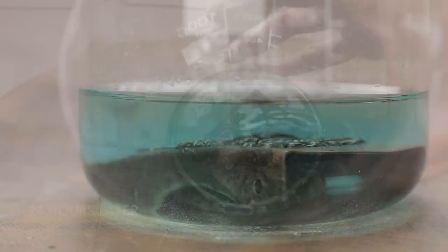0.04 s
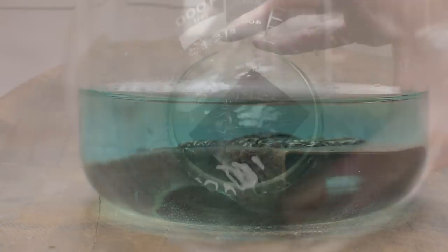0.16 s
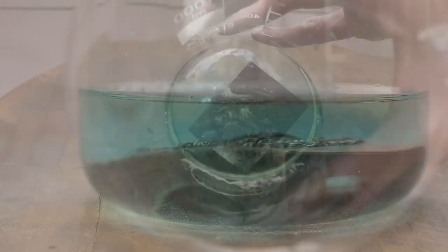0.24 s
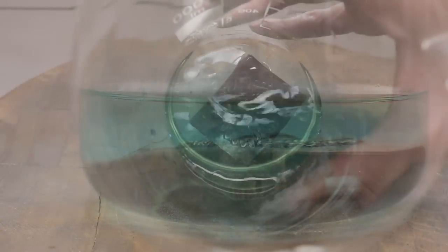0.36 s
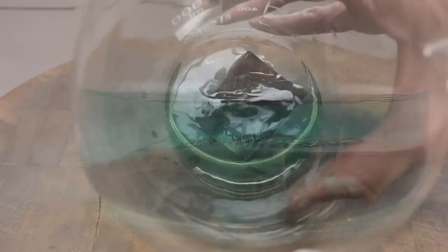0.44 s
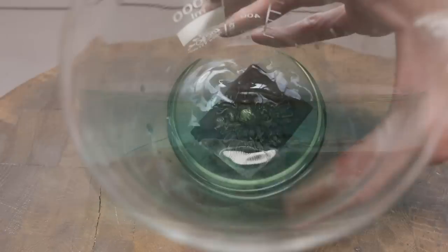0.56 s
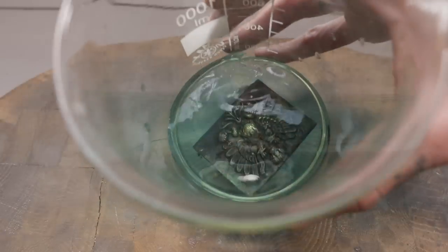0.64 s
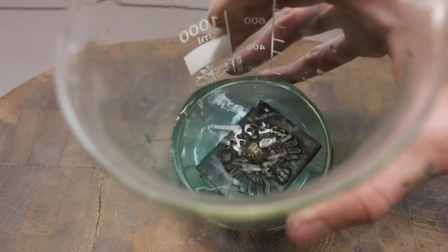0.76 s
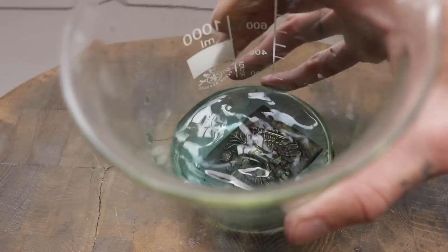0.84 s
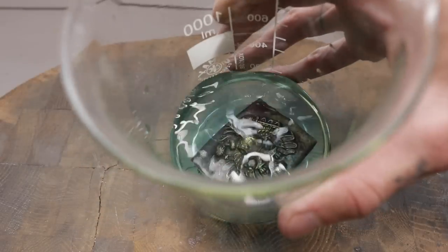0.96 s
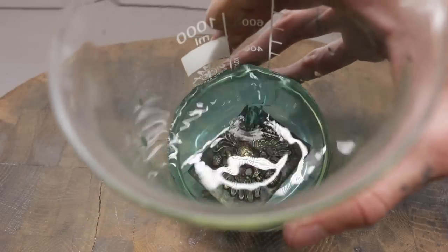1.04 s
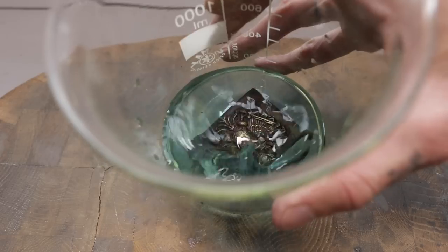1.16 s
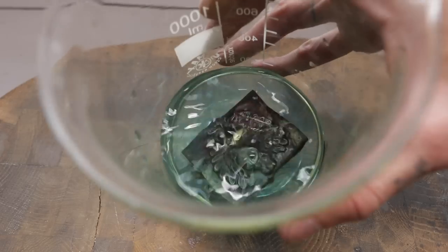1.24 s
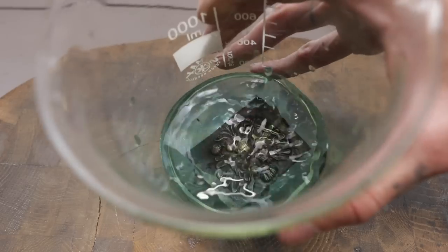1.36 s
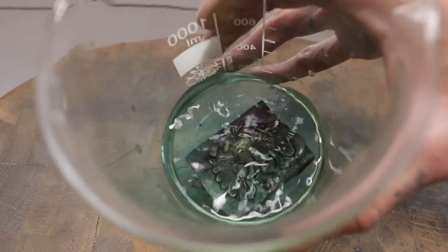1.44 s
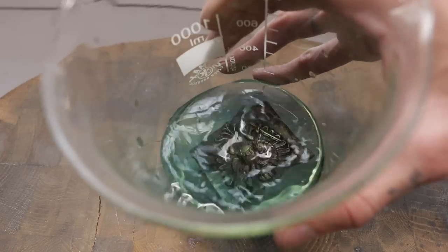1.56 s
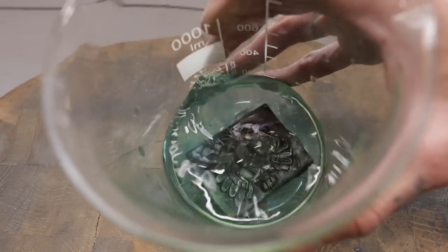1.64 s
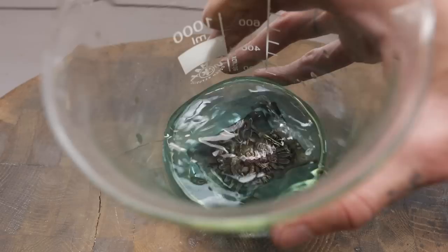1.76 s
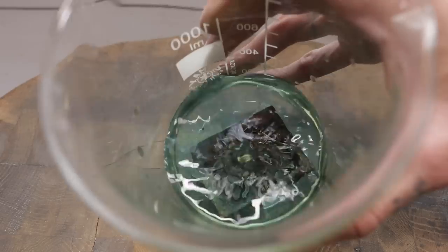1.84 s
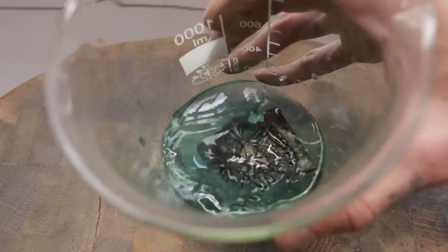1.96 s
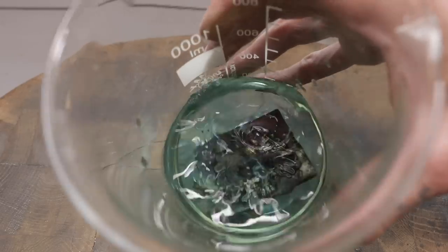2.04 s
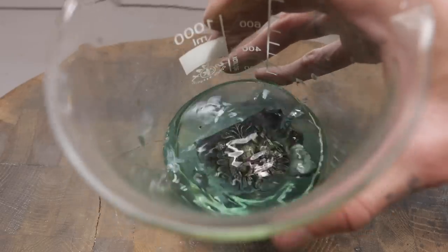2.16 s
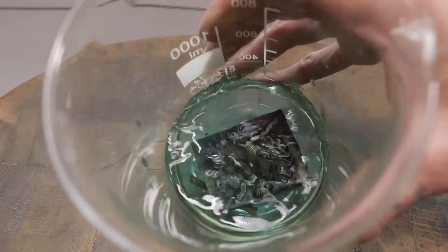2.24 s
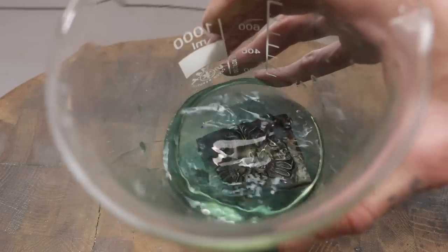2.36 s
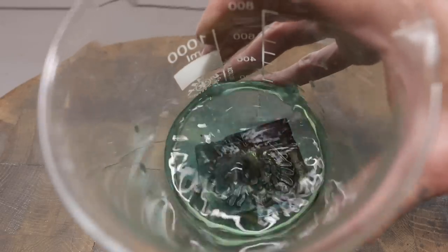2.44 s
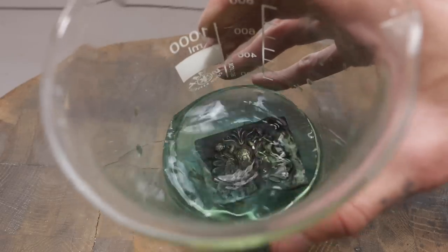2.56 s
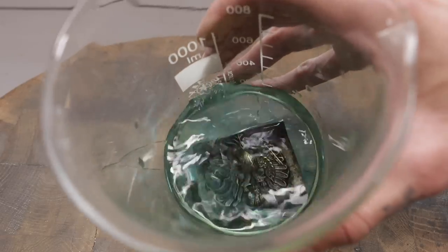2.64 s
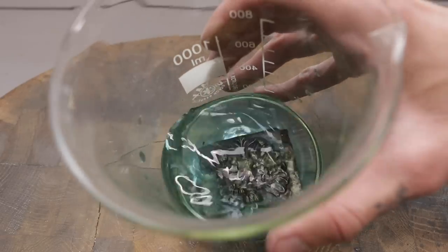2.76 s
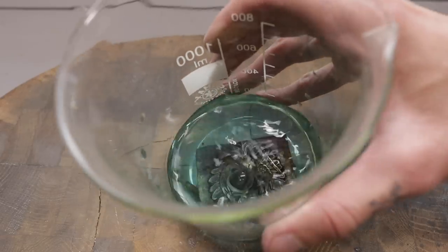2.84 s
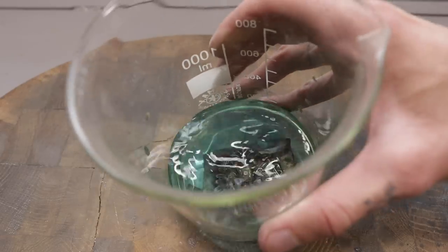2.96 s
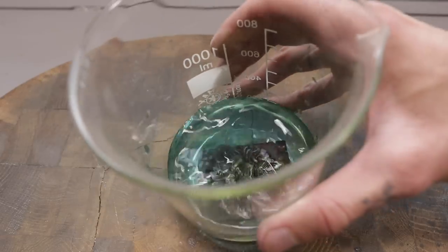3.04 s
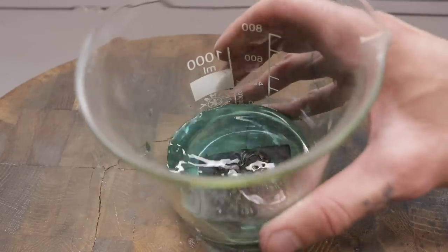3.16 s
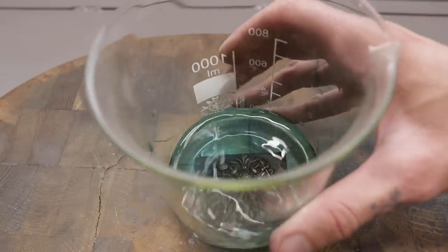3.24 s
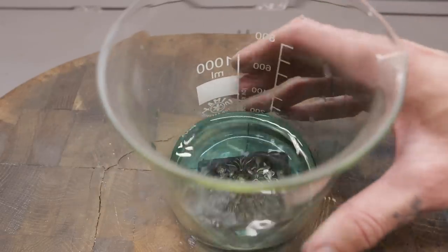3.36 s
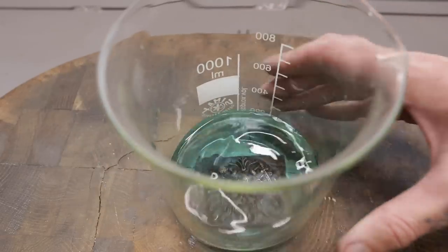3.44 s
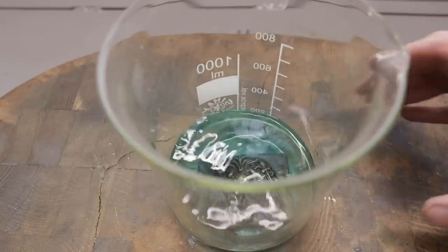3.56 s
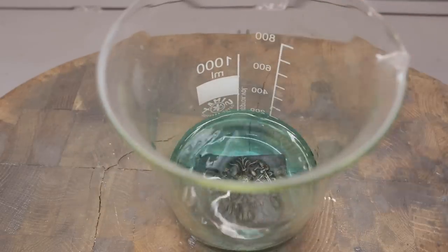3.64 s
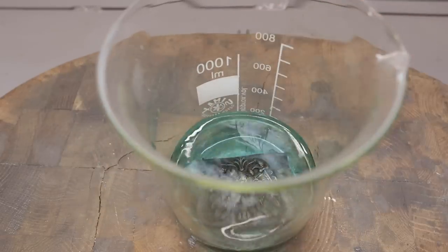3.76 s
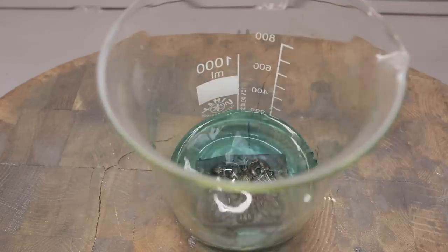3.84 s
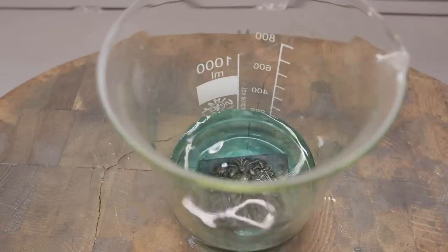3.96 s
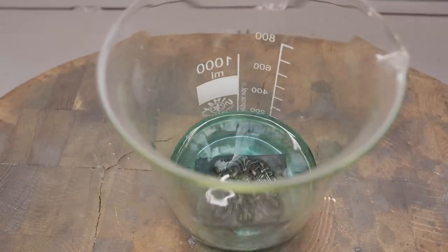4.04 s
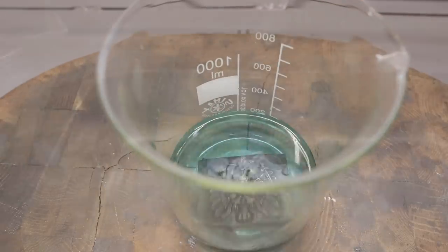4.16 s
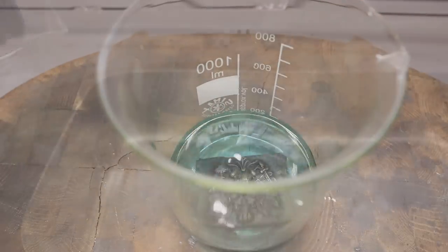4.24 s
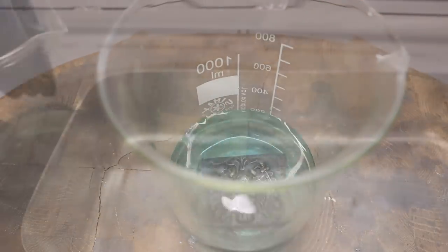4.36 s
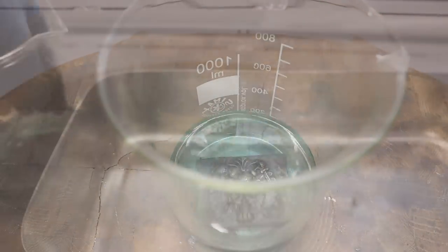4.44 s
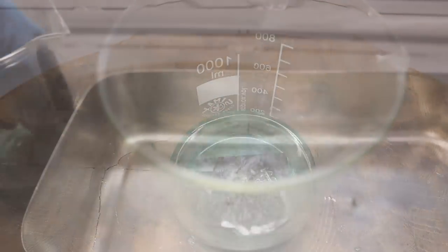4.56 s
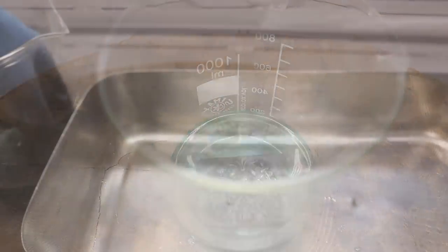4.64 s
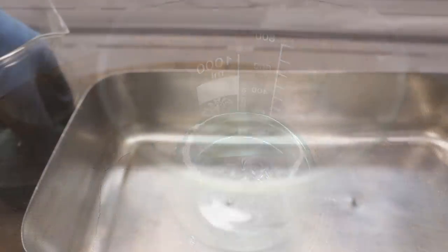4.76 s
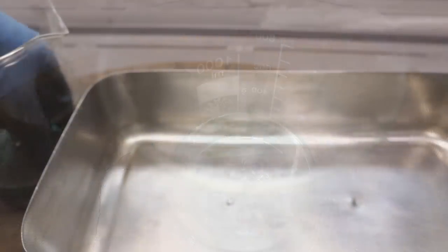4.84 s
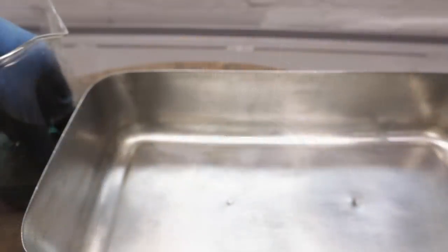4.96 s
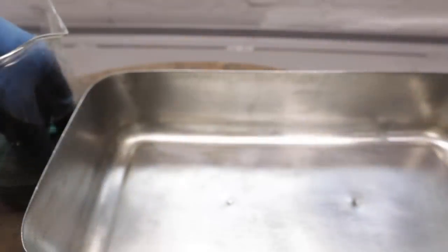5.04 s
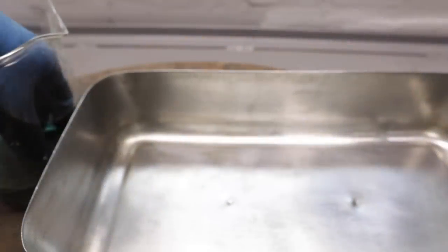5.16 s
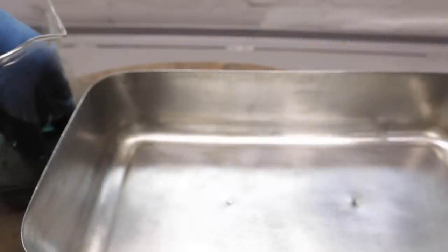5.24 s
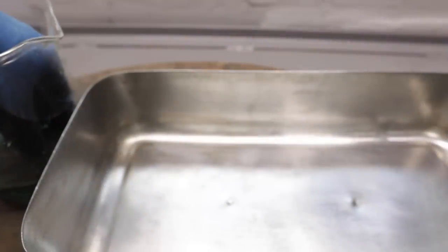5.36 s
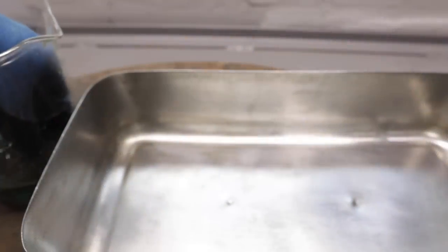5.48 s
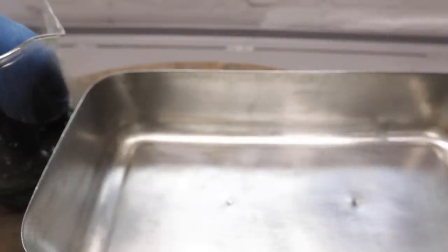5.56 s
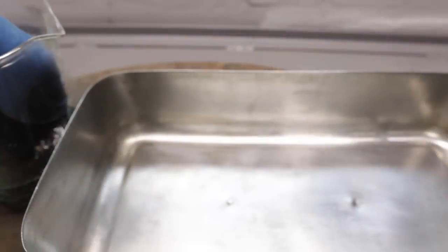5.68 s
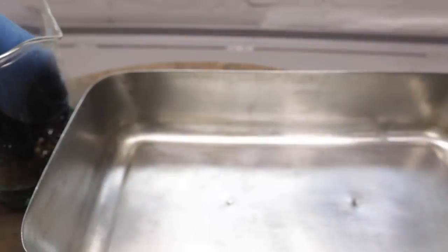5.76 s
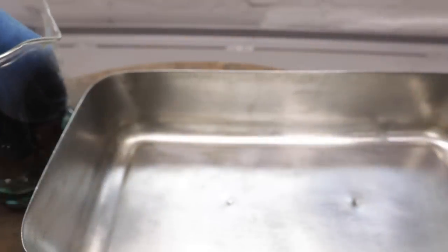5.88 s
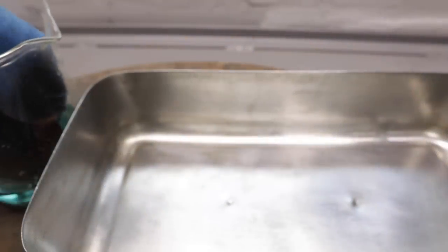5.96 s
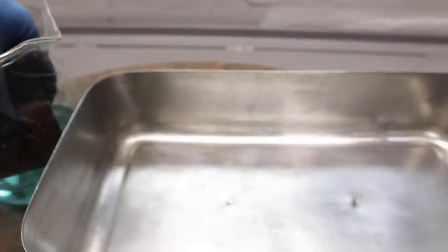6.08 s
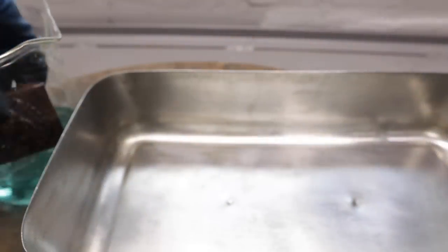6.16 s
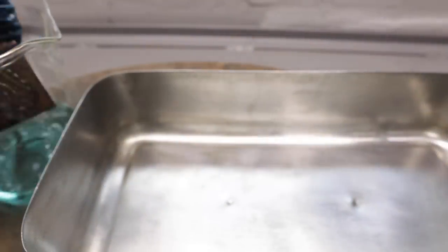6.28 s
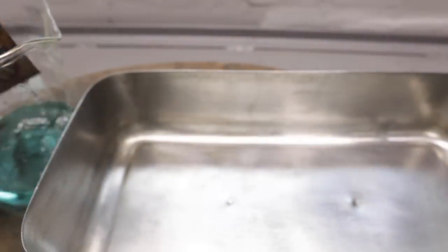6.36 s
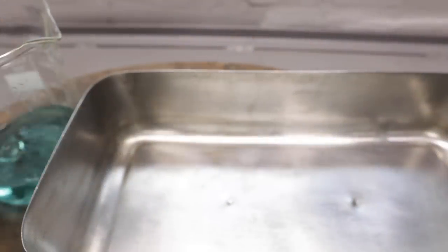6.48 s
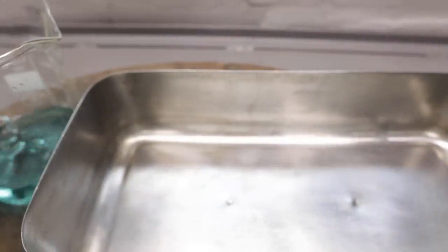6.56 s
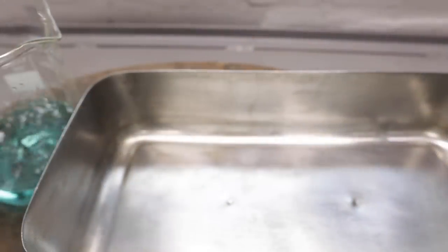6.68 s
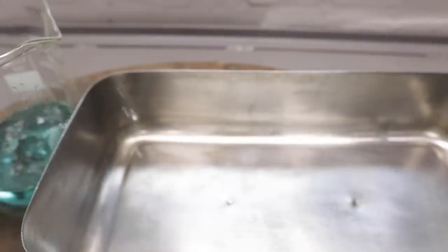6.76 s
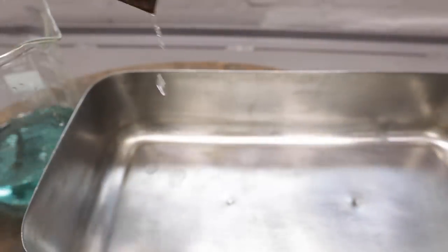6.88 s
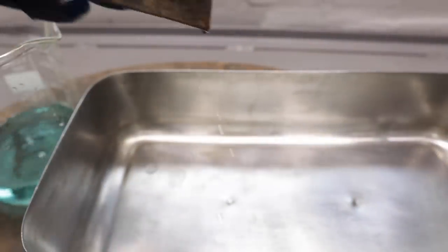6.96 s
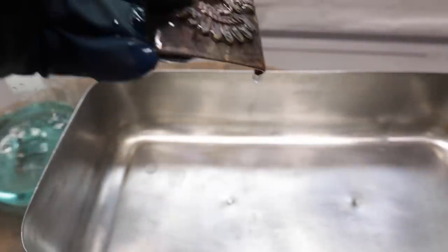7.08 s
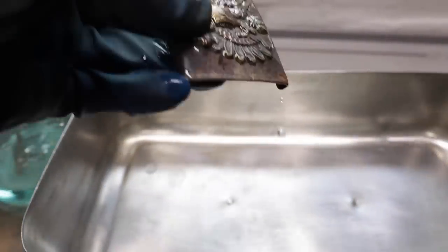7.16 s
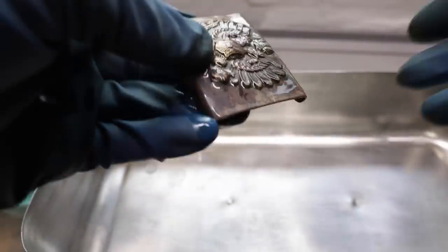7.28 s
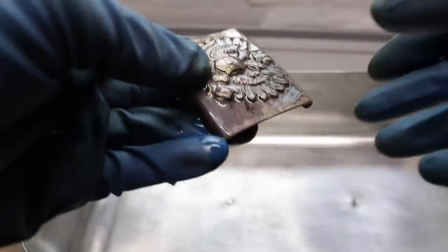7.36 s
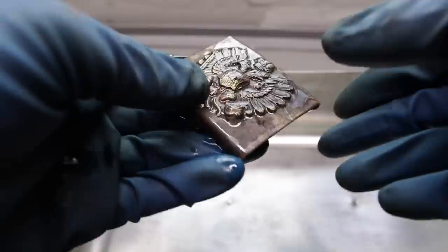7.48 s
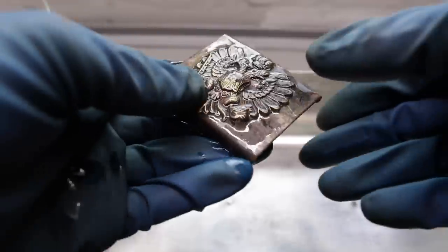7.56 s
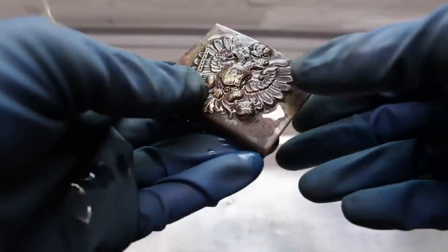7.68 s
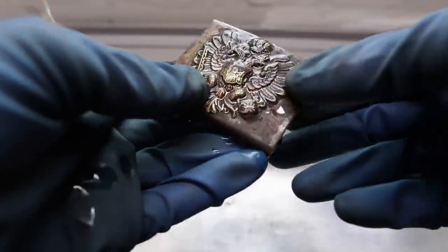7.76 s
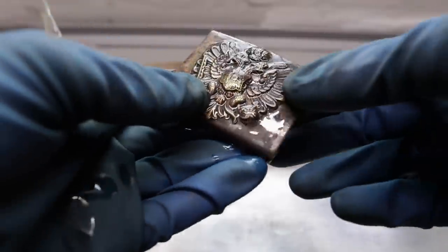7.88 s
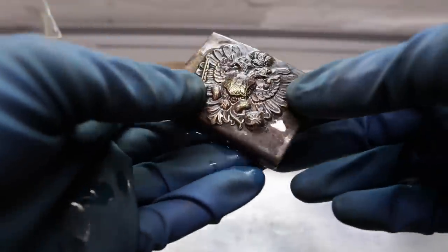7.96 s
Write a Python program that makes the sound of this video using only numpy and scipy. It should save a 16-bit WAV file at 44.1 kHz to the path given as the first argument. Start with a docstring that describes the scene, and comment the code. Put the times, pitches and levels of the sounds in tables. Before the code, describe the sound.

A metal buckle clinks and slides inside a swirled glass beaker, the beaker thuds onto wood, then gloved fingers fish it out with scrapes and ringing knocks.

```python
"""In a small hard room a hand swirls a glass beaker: a metal buckle clinks and slides in the liquid.
The beaker is set on a wooden board; later gloved fingers fish the buckle out of it, tilted, with scrapes,
knocks, squeaks and a drip, and single tones of the glass ring on. Blows and rubbing noise excite damped
modes of the glass, soft pushes ring the wood, and coloured noise makes the rubber and the faint hiss of a
close microphone."""
import sys
import numpy as np
from scipy import signal
from scipy.fft import rfft, irfft, next_fast_len
from scipy.io import wavfile
from scipy.ndimage import map_coordinates

SR = 44100
rng = np.random.default_rng(int(sys.argv[2]) if len(sys.argv) > 2 else 0)


def elevation(decibels):
    """Turn decibel levels (scalar or array-like) into linear amplitude ratios."""
    levels = np.asarray(decibels, float)
    return 10 ** (levels / 20)


def store_pcm(level_fs):
    """Save levels as 16-bit WAV."""
    pcm = np.round(np.clip(level_fs, -1, 1) * 32767).astype(np.int16)
    wavfile.write(sys.argv[1], SR, np.atleast_2d(pcm).T)


N = 353461

# spectrum of the quiet air: frequency_hz, level_db (relative)
AIR_SPECTRUM = [(15, -33), (25, -15.5), (50, -3.5), (68, -2.5), (90, -11), (230, -10.5), (700, -14),
                (1500, -19), (3000, -25.5), (5500, -35), (8500, -35), (10500, -28.5), (15300, -33),
                (16300, -50)]
# its level in time: time_s, level_db
AIR_LEVEL = [(0, -59), (.2, -61), (.4, -63), (3, -60.5), (4.3, -61.5), (4.6, -57.5), (8.01, -63.5)]
# decay of the room: frequency_hz, t60_s
ROOM_DECAY = [(150, 0.63), (700, 0.66), (2500, 0.69), (6000, 0.69), (14000, 0.15)]
# treble response of the microphone: frequency_hz, gain_db
MICROPHONE_RESPONSE = [(11000, -0.01), (14000, -2.5), (15500, -3.5), (16000, -9.5), (16800, -20)]

# modes of the wooden board: frequency_hz, level_db, t60_s
BOARD_MODES = [(137, -24.5, 0.25), (182, -21.5, 0.21), (283, -16.5, .06), (410, -13.5, 0.024),
               (530, -4, 0.018), (693, 3, 0.022), (800, -5, 0.049), (956, -1.5, 0.031), (1260, 1.5, 0.011),
               (1782, -2.5, 0.0055), (2350, 0, 0.0037), (3600, -21, .005)]
# glass base meeting the board: start_s, push_db, softness_hz (lower is softer)
SET_DOWNS = [(2.995, -6.5, 5000), (3.316, -39, 1500), (3.341, -27, 977), (3.361, -9.5, 600),
             (3.3703, -14.5, 2480), (3.381, -10, 544), (4.534, -32.5, 808), (4.625, -25, 700),
             (5.439, -30, 496)]

# wet gloves rubbing: start_s, length_s, strength_db, weight_db, wetness_db
GLOVE_RUBS = [(4.42, .16, -69, -1.5, 5), (4.6, .7, -68.5, 5, -14), (5.35, .1, -64.5, -5.5, 4.5),
              (5.55, 0.16, -60, -2.5, -3), (5.7, 0.73, -66, 0, -5.5), (6.55, 0.31, -63.5, -14.5, -8.5),
              (6.865, 0.089, -57.5, -2.5, 0), (6.95, 0.079, -53, -6.5, -9), (7.05, 0.029, -60, 4.5, -5),
              (7.12, 0.21, -63.5, -9, -3.5), (7.2, 0.23, -71.5, -9.5, -4.5), (7.325, 0.016, -58, 4.5, -5),
              (7.385, 0.016, -59, 3.5, -6), (7.45, .33, -62, -22, -7.5), (7.8, 0.42, -67, -4.5, -7)]
# spectra of thud, rasp and hiss of rubber: frequency_hz, level_db (relative)
RUBBER_SPECTRA = [
    [(100, -78.5), (250, -39.5), (500, -3.5), (800, -11.5), (1300, -9.5), (1900, -21), (4000, -82.5)],
    [(600, -68.5), (1500, -16), (2400, -7), (3300, -13), (5200, -23.5), (9000, -72)],
    [(2500, -70), (4500, -18.5), (6000, -5), (7700, 1.5), (8700, -4.5), (10500, 0.5), (12000, -3),
     (14000, -25), (16000, -46.5)],
]
# how thud, rasp, hiss take a rub: offset_db, share of weight, share of wetness
RUBBER_TAKES = [(.5, 1.2, .05), (.5, .05, 0.064), (.5, -.05, 1.05)]
# slips in thud, rasp, hiss: rate_per_s, spread_db
RUBBER_SLIPS = [(150, 7), (200, 7.5), (220, 8)]
# squeaks and a drip's bubble: start_s, length_s, start_hz, end_hz, level_db, octave_db
CHIRPS = [(4.901, .016, 4300, 4800, -45, 0), (6.733, .011, 2300, 6800, -44, -30),
          (6.741, .02, 5850, 5900, -49, -30), (6.875, .04, 3050, 3600, -52, -3),
          (6.775, .012, 7600, 7700, -61, -30)]
# ticks of liquid film and rubber, and low thumps, one of them the microphone overloading
# at the hardest knock: start_s, level_db, pitch_hz
TICKS = [(4.3206, -51, 2720), (4.893, -54, 7000), (6.1656, -38, 103.4), (6.527, -48, 840),
         (6.657, -53, 7980), (6.674, -47, 11900), (6.7402, -25.5, 11500), (6.922, -47, 10950),
         (6.968, -47.5, 425), (7.0005, -35.5, 2196), (7.001, -44, 820), (7.188, -41, 9970),
         (7.41, -46, 10810), (7.631, -39.5, 9500), (7.747, -42.5, 9530)]

# single ringing tones of the tilted glass, one short, the others long:
# start_s, pitch_hz, level_db, rise_s, t60_s
GLASS_TONES = [(4.566, 4030, -34, .001, 0.11), (4.57, 780, -44, 0.0099, 3.5), (5.66, 701, -36, 0.012, 2),
               (5.702, 1962, -37.5, 0.0097, 1.14), (6.3, 1908, -31.5, 0.085, 1.39),
               (6.32, 1907, -46, 0.25, 2.6), (6.33, 702, -44, 0.063, 0.91), (6.72, 617, -53, .04, 0.7)]

# modes of the upright beaker with the buckle in it: frequency_hz, width_hz, level_db (relative in its zone)
UPRIGHT_MODES = [(588, 38, -20.5), (937, 130, -21), (1426.7, 20, 4), (1795, 200, -13.5), (2220, 180, -23),
                 (2320, 40, -21), (2695, 25, -10), (2720, 22, -7), (2799, 15, 0), (2850, 30, -9),
                 (2977, 25, -13), (3655, 24, -13.5), (3830, 18, -21), (4290, 33, -19.5), (4706, 48, -8),
                 (4775, 50, -10.5), (5060, 90, -15.5), (5400, 70, -20.5), (6170, 23, -18), (6625, 53, -17),
                 (7200, 44, -21), (7910, 40, -17.5), (8340, 92, -16.5), (8870, 60, -17.5), (9410, 45, -15),
                 (9750, 76, -17), (10230, 45, -17.5), (11450, 150, -24.5), (12350, 51, -16.5),
                 (13400, 120, -29)]
# edges of its frequency zones: edge_hz
UPRIGHT_ZONES = [350, 2000, 3300, 5600, 9000, 15000]
# how each zone takes a contact: offset_db, share of spot, share of hardness, skid_db, rubbing_hiss_db
UPRIGHT_TAKES = [(1, -1.05, 0.045, -24.5, -16), (0, 0.78, .05, -25.5, -21.5), (-3, 0.15, 0.79, -25, -13),
                 (-1, -0.32, 1.1, -24.5, -7.5), (-2, -0.19, 1.3, -28, -7.5)]
# clinks: start_s, strength_db, spot_db (from bottom to wall), hardness_db
CLINKS = [(0.9939, -47, -8.5, -12.5), (1.007, -36, -3, -20), (1.105, -34.5, -5, 4.5),
          (1.1193, -14.5, 0, -3), (1.1343, -16.5, 6, -0.5), (1.156, -27.5, -2.5, -8), (1.225, -21, 1, -9),
          (1.2845, -28, 6, -18), (1.356, -26, 0.5, -10.5), (1.4075, -13, 3, -2.5), (1.4283, -23, 7, 1.5),
          (1.467, -27, 13.5, -9.5), (1.4955, -28, 11, -17), (1.5718, -16, 3, -9.5), (1.5866, -38, -8.5, 4),
          (1.643, -18.5, 1, -10), (1.762, -19, 1, -7.5), (1.7826, -13.5, -0.5, -5),
          (1.832, -27.5, 5.5, -11.5), (1.8627, -21.5, -3, .5), (1.9913, -15.5, 2, -14),
          (2.002, -24, -1.5, 7), (2.02, -22, 7.5, -7.5), (2.1806, -13, 1, -4.5), (2.2157, -18, 4.5, -1.5),
          (2.2546, -19.5, 5, 2.5), (2.2811, -28, -10, -3.5), (2.322, -25.5, 4.5, -3.5),
          (2.405, -18.5, 3.5, -2.5), (2.42, -16.5, 1, -7.5), (2.4413, -21, 6.5, -2.5),
          (2.5575, -17.5, 2.5, -1.5), (2.568, -21, 8.5, -9.5), (2.618, -44.5, -9.5, 1),
          (2.995, -22.5, -5.5, -13), (3.368, -31.5, -4, -15)]
# longer slides over the bottom: start_s, length_s, strength_db, spot_db, hardness_db
SLIDES = [(.975, .12, -61, -3, -0.5), (1.106, .07, -40, 7.5, -4), (1.348, .04, -40, 2, -10),
          (1.473, .1, -51, 12.5, -3.5), (1.787, .05, -28.5, 9.5, -9.5), (1.834, .1, -43.5, 2, -19.5),
          (2.282, .09, -39, 5, -10.5), (1.664, 0.13, -52.5, 3, -3.5), (2.06, 0.19, -53, 3.5, -2.5),
          (2.625, .07, -59, 1, -5), (2.79, 0.027, -54, 4, 0), (3.032, 0.078, -46.5, 2.5, -20.5),
          (3.102, 0.13, -58, 0.5, -17), (3.29, .1, -58.5, 2, -1.5), (3.415, .12, -68, -12, -26)]

# modes of the tilted beaker: frequency_hz, width_hz, level_db (relative in its zone),
# lifted_db (change once the buckle is lifted clear)
TILTED_MODES = [(521, 22, -5.5, 4.5), (700, 8, -4, -2), (770, 29, -15, -21), (1337, 83, -13.5, 3),
                (1490, 17, -12.5, -13), (1578, 90, -8, -5), (1926, 32, -11.5, 5), (2130, 21, -18, 3),
                (2330, 20, -15, 5.5), (2530, 59, -18, 9.5), (2940, 56, -12.5, -8), (3590, 30, -18, 14),
                (3642, 18, 0, -16), (3862, 30, -10, -8), (3920, 35, -12, 12), (4621, 18, -2, -14),
                (4670, 30, -18, 12), (5470, 30, -18, 4), (6350, 50, -11, 3), (6800, 40, -11, -4),
                (7000, 50, -12, 0), (7200, 28, -8, -8), (7310, 30, -12, 3), (7660, 40, -9, -4),
                (8070, 50, -10, 0), (8600, 38, -15, 2), (9560, 75, -16, -5.5), (9425, 28, -9, -12),
                (9930, 37, -12, -3.5), (10380, 54, -8, -4), (10100, 60, -15, -1.5), (11500, 57, -16, -0.5),
                (12000, 80, -29, -7.5)]
# edges of its frequency zones: edge_hz
TILTED_ZONES = [300, 1000, 2500, 3750, 5600, 15000]
# how each zone takes a contact: offset_db, share of spot, share of hardness, skid_db, rubbing_hiss_db
TILTED_TAKES = [(-8, -1.3, .05, -24.5, -15), (.5, -0.058, .05, -33, -15), (-8.5, 0.58, 0.24, -23, -6.5),
                (-7.5, 0.32, 0.63, -27, -5), (-2, .05, 0.91, -37.5, -6.5)]
# knocks: start_s, strength_db, spot_db (from hollow to ringing), hardness_db
KNOCKS = [(4.567, -22.5, -2, 0), (4.6245, -42, -22, -21), (4.7445, -42, -3, -10.5),
          (4.933, -33.5, -2, -7.5), (4.9436, -43, -2.5, 4), (4.982, -30.5, 1, -12.5), (5.05, -53, -15, 9.5),
          (5.06, -36.5, -1, -25.5), (5.196, -43.5, -10.5, 1), (5.239, -45, 0.5, -7), (5.612, -49, 13, 3),
          (5.658, -27, -11, -6.5), (5.6655, -29, -5, -3), (5.68, -22.5, -1, -1.5), (5.7055, -19, 1.5, 5.5),
          (5.7184, -41.5, 5.5, 17.5), (5.8283, -26, -1, 1), (5.86, -23, -1, 4.5),
          (5.9205, -30.5, -2.5, 4.5), (6.0115, -26, 0.5, -13.5), (6.0321, -18, 23, 1.5),
          (6.0535, -27, 3, 4.5), (6.165, -15, 6.5, 7), (6.1705, -35.5, 4, 12)]
# drags along the wall: start_s, length_s, strength_db, spot_db, hardness_db
DRAGS = [(4.56, 0.074, -32.5, -3.5, -21), (4.646, 0.093, -49.5, -13, -16), (4.899, .03, -56, -5, -1),
         (4.996, 0.042, -61, -19, 6), (5.152, .05, -55.5, -2.5, 9.5), (5.379, 0.086, -65.5, -19, -4),
         (5.579, 0.19, -59, -11, 1), (5.726, 0.066, -47, 1.5, -5), (5.87, 0.11, -43, -6.5, 2),
         (6.056, 0.093, -39.5, 14, -11), (6.236, .1, -43.5, 8, 1.5), (6.337, 0.077, -48.5, 1.5, 1),
         (6.428, 0.092, -58.5, 4, -8)]

# spread of a mode's share from blow to blow, by zone: scatter_db
SCATTER_DB = [2.5, 2.5, 3, 3.5, 4.5]
# extra crack of a blow, by zone: crack_db
BRITTLE_DB = [1, 0.5, 1.5, 4.5, 4.5]
GRIP_S = 6.02  # until now fingers pinch the buckle
LIFT_S = 6.16  # the buckle leaves the liquid


def unit(x):
    """Normalisation: the signal scaled to rms 1."""
    return x / np.sqrt(np.mean(x ** 2) + 1e-20)


def along(points, hz):
    """Interpolation of (frequency_hz, value) points on a logarithmic frequency axis."""
    f, v = np.transpose(points)
    return np.interp(np.log(hz + 1), np.log(f + 1), v)


def filtered(x, response):
    """Linear filtering: the spectrum of x times a (frequency_hz, gain_db) response."""
    m = next_fast_len(N + SR // 4)
    gain = elevation(along(response, np.fft.rfftfreq(m, 1 / SR)))
    return irfft(rfft(x, m) * gain, m)[..., :N]


def gains(rows):
    """Envelopes: one gain per sample for each dB column; silent before the table, fading after it."""
    s, *cols = np.transpose(rows)
    t = np.arange(N) / SR
    return np.array([elevation(np.interp(t, [*s, s[-1] + .2], [*c, -100], -140)) for c in cols])


def air():
    """Stationary noise: random samples shaped by a spectrum, their level drifting slowly."""
    return gains(AIR_LEVEL)[0] * unit(filtered(rng.standard_normal(N), AIR_SPECTRUM))


def room(x):
    """Reverberation: convolution with decaying noise tails, treble dying first."""
    out, step = np.zeros(N + 2 * SR), SR // 4
    # a new random tail is drawn each 1/4 s, so that no one pattern stays
    noise = rng.standard_normal((N // step + 1, SR * 3 // 4))
    hz, t, z = signal.stft(noise, SR, nperseg=256)
    decay = elevation(-60 * t / along(ROOM_DECAY, hz)[:, None])
    tails = signal.istft(z * decay, SR, nperseg=256)[1]
    # echoes take a moment to gather
    tails = tails * (1 - np.exp(-np.arange(tails.shape[1]) / (0.0022 * SR)))
    for k, tail in enumerate(tails):
        answer = signal.fftconvolve(x[k * step:][:step], tail / np.linalg.norm(tail))
        out[k * step:][:len(answer)] += answer
    return out[:N]


def ring(force, hz, t60, swell):
    """Resonance: a damped mode that builds over swell seconds; a unit impulse gives amplitude about 1."""
    turn = 2 * np.pi * hz / SR
    r, q = np.exp(-np.array([np.log(1000) / t60, 1 / swell]) / SR)  # pole radii of decay and swell
    poles = [[1, -2 * p * np.cos(turn), p * p] for p in (r, q)]
    mode = [0, np.sin(turn), 0, *poles[0]]
    build_up = [1 - q, 0, q - 1, *poles[1]]
    return signal.sosfilt([mode, build_up], force)


def board():
    """Impact on wood: each contact is a push, duller when soft, that excites the modes of the board."""
    push, t = np.zeros(N + SR), np.arange(SR // 50) / SR
    for s, db, soft_hz in SET_DOWNS:
        pulse = t * np.exp(-2 * np.pi * soft_hz * t)
        push[round(s * SR):][:len(t)] += elevation(db) * pulse / pulse.sum()
    out = np.zeros(N)
    for k, (hz, db, t60) in enumerate(BOARD_MODES):
        out += (-1) ** k * elevation(db) * ring(push[:N], hz, t60, swell=0.00061)
    return out


def grit(rate, spread_db):
    """Friction noise: dense small slips of uneven size over a smooth rub, rms 1."""
    size = elevation(spread_db * np.minimum(rng.exponential(size=N), 3))
    slips = (rng.random(N) < rate / SR) * size
    return unit(rng.standard_normal(N) * (1 + slips))


def taken(takes, db, spot_db, hard_db):
    """Distribution of excitation: the dB that each zone gets from each contact."""
    return np.array([db + row[0] + row[1] * spot_db + row[2] * hard_db for row in takes])


def strokes(rows, takes, rise, fall):
    """Friction envelope, one per zone: every stroke swells, holds and dies away (rise, fall in s)."""
    s, length, *touch = np.transpose(rows)
    out = np.zeros((len(takes), N))
    for begin, hold, gain in zip(s, length, elevation(taken(takes, *touch)).T):
        t = np.arange(round((hold + 6 * fall) * SR)) / SR
        shape = np.minimum(t / rise, 1) ** 2 * np.exp(-np.maximum(t - hold, 0) / fall)
        part = out[:, round(begin * SR):][:, :len(t)]
        part += gain[:, None] * shape[:part.shape[1]]
    return out


def glove_rubbing():
    """Friction: wet rubber rustles as gritty noise in three colours, thud, rasp and hiss."""
    out = np.zeros(N)
    rubs = strokes(GLOVE_RUBS, RUBBER_TAKES, rise=.03, fall=0.045)
    for gain, spectrum, slips in zip(rubs, RUBBER_SPECTRA, RUBBER_SLIPS):
        out += gain * unit(filtered(grit(*slips), spectrum))
    return out


def chirps():
    """Frequency glide: squeaks and a drop's bubble rise in pitch, each with its octave."""
    out = np.zeros(N + SR)
    for s, length, hz0, hz1, db, octave_db in CHIRPS:
        u = np.arange(round(length * SR)) / (length * SR)
        phase = 2 * np.pi * length * (hz0 * u + (hz1 - hz0) * u ** 2 / 2)
        # the wet film sticks and slips 180 times a second
        flutter = elevation(5.6 * np.sin(2 * np.pi * 180 * length * u))
        tone = np.sin(phase) + elevation(octave_db) * np.sin(2 * phase)
        out[round(s * SR):][:len(u)] += elevation(db) * flutter * np.sin(np.pi * u) * tone
    return out[:N]


def ticks_and_thumps():
    """Damped oscillation: each is a sine dying within a few cycles, cut off after 10 ms."""
    out, t = np.zeros(N + SR), np.arange(SR // 100) / SR
    for s, db, hz in TICKS:
        out[round(s * SR):][:len(t)] += elevation(db) * np.exp(-t * hz / 5.6) * np.sin(2 * np.pi * hz * t)
    return out[:N]


def glass_tones():
    """Free vibration: single tones of the tilted glass build up and decay, one short, the others long."""
    t, out = np.arange(N) / SR, np.zeros(N)
    for s, hz, db, rise, t60 in GLASS_TONES:
        u = np.maximum(t - s, 0)
        out += elevation(db - 60 * u / t60) * (1 - np.exp(-u / rise)) * np.sin(2 * np.pi * hz * u)
    return out


def wobble(rate, size):
    """Random modulation: straight lines between random knots, rate knots a second."""
    knots = rng.standard_normal(int(size * rate / SR) + 4)
    return map_coordinates(knots, [np.arange(size) * rate / SR], order=1)


def glass(modes, zones, takes, blows, rubbing, swell, chatter, crack_db, crack_t60, skid_s):
    """Modal excitation: blows and rubbing ring the modes zone by zone; each blow adds a short broad crack."""
    hz, width, db, *lifted_db = np.transpose(modes)
    times, *touch = np.transpose(blows)
    blow_db = taken(takes, *touch)
    at = np.round(times * SR).astype(int)
    first, last = round((times[0] - .05) * SR), round((rubbing[-1][0] + .6) * SR)
    zone = np.searchsorted(zones[1:-1], hz)
    rub = strokes(rubbing, takes, rise=0.014, fall=0.01)
    # a wider peak starts stronger and dies sooner
    start, t60 = elevation(db) * width, np.log(1000) / (np.pi * width)
    keep = np.exp(-1 / (skid_s * SR))
    t, out = np.arange(SR // 10) / SR, np.zeros(N)
    for z in range(len(zones) - 1):
        mine = np.flatnonzero(zone == z)
        share = start[mine] / np.linalg.norm(start[mine])

        # a struck buckle skids on, strongest after skid_s
        skid_hits = np.bincount(at, elevation(blow_db[z] + takes[z][3]), N)
        skid = signal.lfilter([0, np.e / (skid_s * SR)], np.poly([keep, keep]), skid_hits)
        scrape = (rub[z] + skid) * grit(540, spread_db=7.5)
        # scaled by the power that the modes of the zone pass on
        drive = scrape / np.sqrt(np.sum(share ** 2 * SR / (4 * np.pi * width[mine])))

        for k, a in zip(mine, share):
            luck = rng.standard_normal((len(times), 3))
            late = rng.exponential(size=(len(times), 2))
            force = drive.copy()
            # the rubbing spot wanders over the mode's shape
            force[first:last] *= elevation(5.8 * wobble(12, size=last - first))
            size = elevation(blow_db[z] + SCATTER_DB[z] * luck[:, 0])  # struck at a new spot each time
            hit_at = np.round((times + .0004 * late[:, 0]) * SR).astype(int)
            bounce_at = np.round((times + chatter * (1 + late[:, 1])) * SR).astype(int)
            np.add.at(force, hit_at, size * np.sign(luck[:, 1]))
            np.add.at(force, bounce_at, 0.6 * size * luck[:, 2])
            if lifted_db:
                # a pinch chokes the purest rings
                force[:round(GRIP_S * SR)] *= elevation(-11 if width[k] < 20 else -2.5)
                force[round(LIFT_S * SR):] *= elevation(lifted_db[0][k])
            out[first:last] += a * ring(force[first:last], hz[k], t60[k], swell)

        # a pinched buckle cracks 4 dB louder
        pinch_db = 4 * (times < GRIP_S) if lifted_db else 0
        crack_hits = np.bincount(at, elevation(blow_db[z] + crack_db + BRITTLE_DB[z] + pinch_db), N)
        burst = np.abs(signal.fftconvolve(crack_hits, elevation(-60 * t / crack_t60))[:N])
        broad = burst * rng.standard_normal(N) + elevation(takes[z][4]) * scrape
        band = signal.butter(3, zones[z:z + 2], "bandpass", fs=SR, output="sos")
        scale = 1 / np.sqrt(2 * (zones[z + 1] - zones[z]) / SR)  # offsets the power lost to the band
        out += scale * signal.sosfilt(band, broad)
    return out


def swirl():
    """Impact and friction: the buckle clinks and slides in the upright beaker."""
    return glass(UPRIGHT_MODES, UPRIGHT_ZONES, UPRIGHT_TAKES, CLINKS, SLIDES, swell=0.00077,
                 chatter=0.0036, crack_db=-20.5, crack_t60=0.071, skid_s=0.02)


def fishing():
    """Friction and impact: fingers drag the buckle up the tilted wall; it slips and knocks."""
    return glass(TILTED_MODES, TILTED_ZONES, TILTED_TAKES, KNOCKS, DRAGS, swell=0.00018,
                 chatter=.004, crack_db=-15.0, crack_t60=0.069, skid_s=0.015)


def scene():
    """Superposition: all sources, their share of room, and the quiet air."""
    upright = swirl()
    tilted = fishing() + glass_tones()
    wood = board()
    hands = glove_rubbing() + chirps() + ticks_and_thumps()
    wet = room(elevation(-13.5) * upright + elevation(-13.0) * tilted + elevation(-9.5) * wood + elevation(-17.5) * hands)
    return (upright + tilted + wood + hands + wet + air())[None]


def roll_off(x):
    """The treble ends steeply here."""
    return signal.sosfilt(signal.butter(12, 16780, fs=SR, output="sos"), x)


def record(dry):
    """Band limit and saturation: top treble fades; peaks round off, one side a little sooner."""
    heard = filtered(dry, MICROPHONE_RESPONSE)
    ceiling = np.where(heard > 0, .72, .82)
    knee = 6  # hardness of the overload knee
    mix = heard / (1 + np.abs(heard / ceiling) ** knee) ** (1 / knee)
    return roll_off(mix)


dry = scene()
out = record(dry)
store_pcm(out)
```